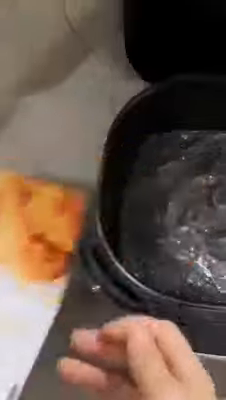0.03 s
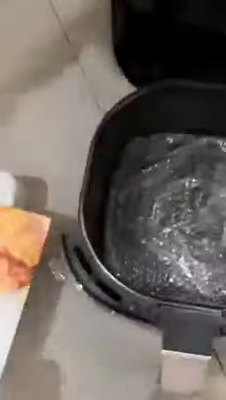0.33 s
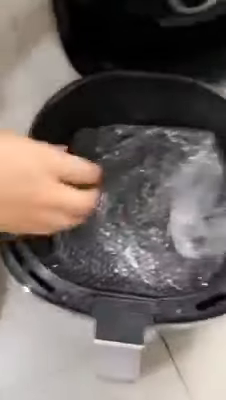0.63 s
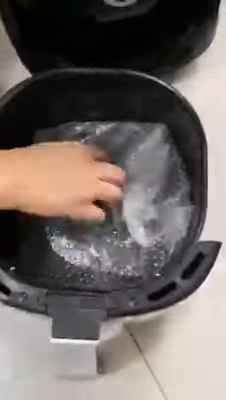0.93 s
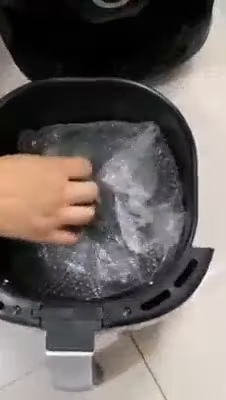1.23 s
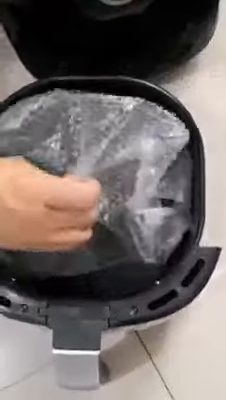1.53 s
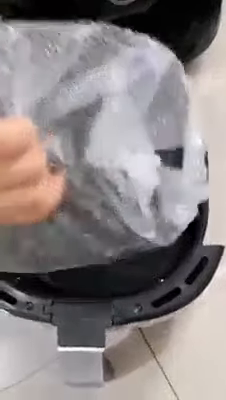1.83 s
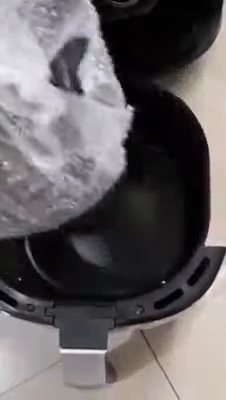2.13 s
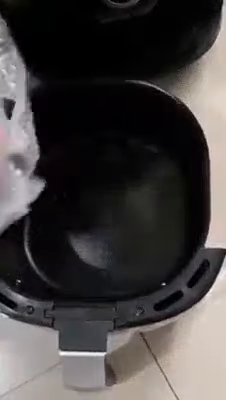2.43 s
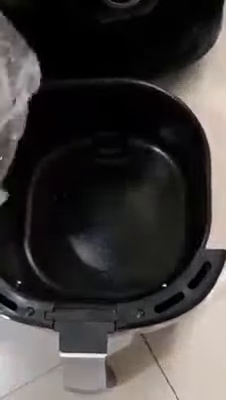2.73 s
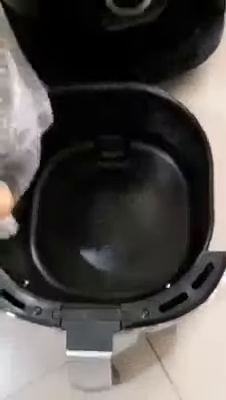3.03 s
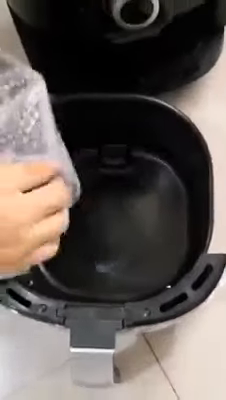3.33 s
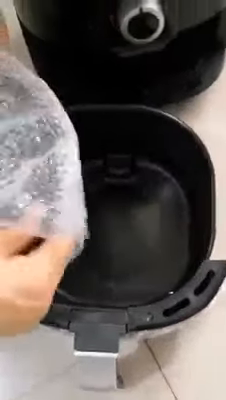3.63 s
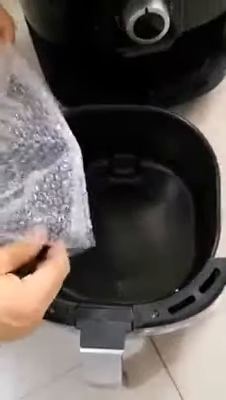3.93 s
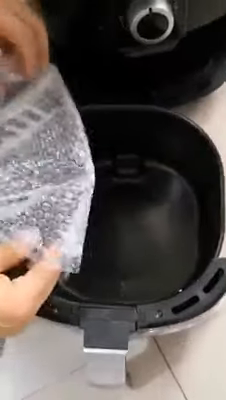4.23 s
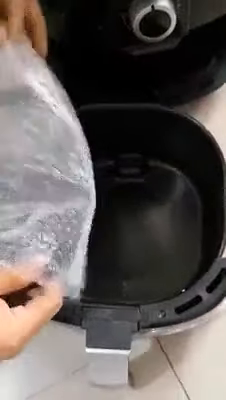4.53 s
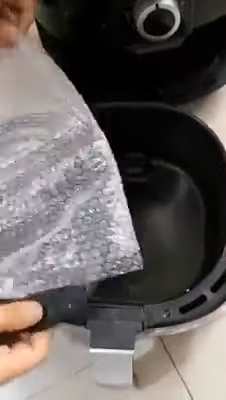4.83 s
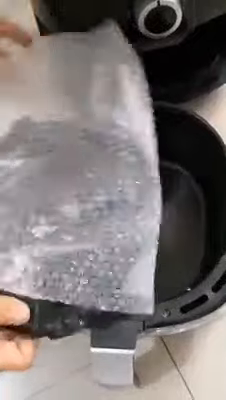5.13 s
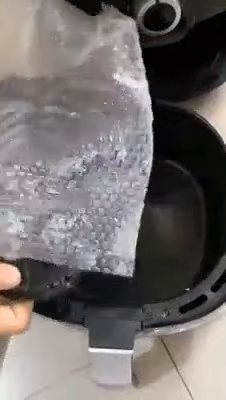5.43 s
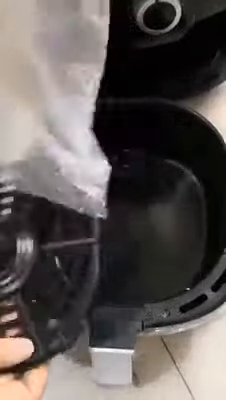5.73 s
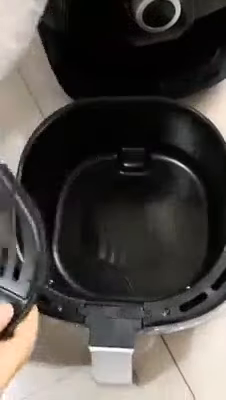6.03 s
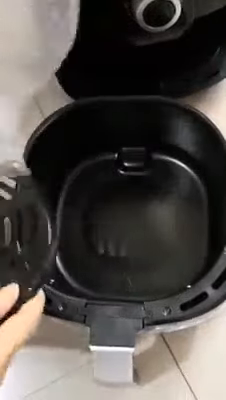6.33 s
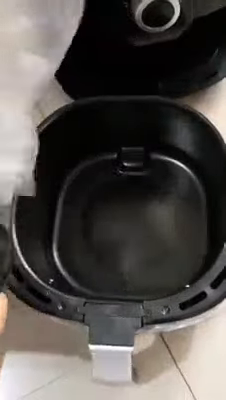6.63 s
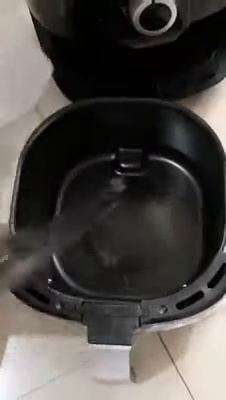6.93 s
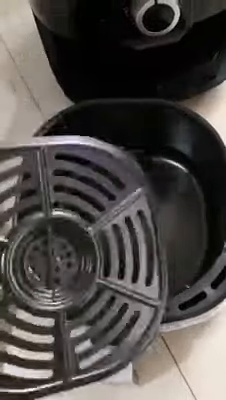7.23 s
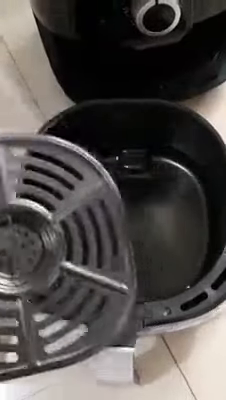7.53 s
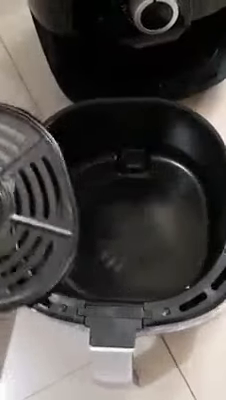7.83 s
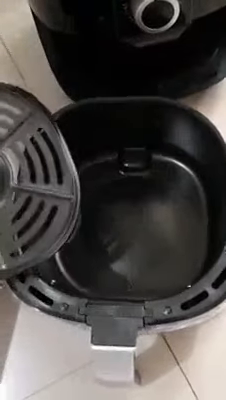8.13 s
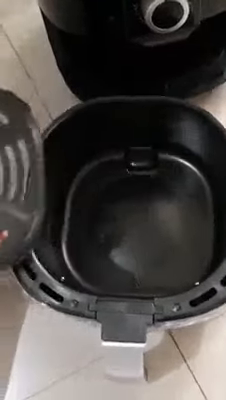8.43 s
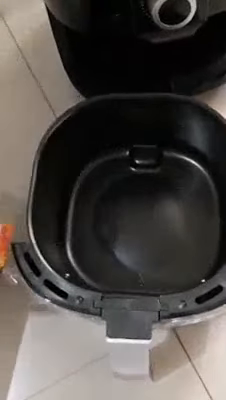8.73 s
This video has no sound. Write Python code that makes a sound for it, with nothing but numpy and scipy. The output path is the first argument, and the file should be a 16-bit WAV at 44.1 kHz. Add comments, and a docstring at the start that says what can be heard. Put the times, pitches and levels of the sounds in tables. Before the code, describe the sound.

A booklet is put down with a few light taps. Bubble wrap starts to crinkle, and the metal plate inside it drops twice into an air fryer basket with short ringing clanks. The wrap crackles in uneven bursts with sharp snaps as it is pulled off. The bare plate knocks softly against the rim, then the wrap rustles aside. The microphone is close, in a quiet room with faint low rumble and hum.

```python
"""On a tiled floor, close to a stereo microphone, a new air fryer is unpacked.
A booklet is put down with a tap, then the crisper plate is lifted in its bubble wrap and drops back
twice into the basket, setting both ringing. The wrap crackles as it is pulled off, its creases
buckling in clumps; the bare plate knocks the rim once and the wrap is pushed aside.
Underneath lie the rumble of arms and floor, a low wavering hum and faint room noise."""
import sys
import numpy as np
from scipy import signal
from scipy.fft import rfft, irfft
from scipy.io import wavfile

SR = 44100
rng = np.random.default_rng(int(sys.argv[2]) if len(sys.argv) > 2 else 0)


def to_wav(sig):
    """Store sig (one row per channel, or 1-D mono) as 16-bit WAV at the path in sys.argv[1].

    Samples outside -1..1 are clipped; the rate is SR.
    """
    pcm = np.clip(np.atleast_2d(sig), -1, 1) * 32767
    pcm = np.round(pcm).astype(np.int16)
    wavfile.write(sys.argv[1], SR, pcm.T)  # frames by channels


N = 387638
TIME = np.arange(N) / SR
BLOW = TIME[:2 * SR // 3]  # seconds after a blow
ROOM_T60_S = 0.31

# Grips and pulls on the wrap. Each row: start, swell and hold in seconds, crisp crackle in dB,
# duller crumpling in dB.
WRAP_PULLS = [(0.0, 0.0016, 0.048, -56, -46), (0.05, 0.061, 0.027, -48.5, -45),
              (0.84, .02, 0.061, -53, -51.5), (0.93, 0.039, 0.035, -35.5, -36),
              (1.025, .025, 0.0099, -39, -39.5), (1.07, 0.081, 0.28, -37.5, -37.5),
              (1.45, 0.027, .2, -41.5, -44.5), (1.7, .02, 0.14, -49, -49.5),
              (2.185, 0.041, 0.092, -39, -43), (2.39, 0.037, .03, -46, -48), (2.49, 0.091, 0.093, -40, -45),
              (2.66, 0.057, 0.066, -36, -43.5), (2.8, .02, 0.079, -44, -50.5),
              (2.96, 0.085, 0.12, -53.5, -56.5), (3.17, 0.055, 0.22, -49, -52), (3.55, .13, 0.17, -43, -47),
              (3.68, 0.052, .015, -33.5, -37), (3.915, 0.032, 0.054, -49.5, -52),
              (4.09, 0.019, 0.074, -48.5, -53), (4.28, .11, 0.087, -47, -52),
              (4.48, 0.032, 0.029, -36.5, -37.5), (4.58, 0.041, 0.1, -35, -35.5),
              (4.83, 0.019, .02, -42.5, -40), (4.87, 0.028, 0.044, -38, -40.5),
              (4.98, .03, .12, -48, -50.5), (5.12, 0.049, 0.21, -43.5, -47.5), (5.39, .04, .11, -39, -40.5),
              (5.52, .05, .055, -33, -34), (5.68, 0.054, 0.016, -34.5, -33), (5.88, 0.038, .03, -50.5, -56),
              (5.98, .03, 0.36, -56, -70), (6.41, .08, .14, -48.5, -52.5),
              (6.66, 0.047, 0.011, -44.5, -46.5), (7.43, 0.019, .1, -51.5, -50),
              (7.545, 0.041, 0.078, -45, -48.5), (7.66, 0.036, 0.043, -43.5, -44.5),
              (7.765, 0.062, 0.11, -41, -42), (7.91, 0.059, .135, -38, -42),
              (8.16, 0.047, 0.13, -56.5, -75), (8.57, 0.067, 0.046, -60, -69)]
SWELL_DB, SAG_DB_PER_S, RELEASE_DB_PER_S, GRAB_DB_PER_S = 11, 10, 240, 805
MIDDLING_PULL_DB, MIDDLING_CREASES_PER_S = -45, 2600
# The film never quite rests between pulls. Each row: time in seconds, crackle level in dB.
FILM_SETTLING = [(0, -60), (0.8, -62), (2.1, -60), (3.5, -63), (6.3, -61), (6.85, -61), (6.95, -65.5),
                 (7.2, -65), (7.38, -71), (7.8, -64), (8.78, -67)]
# The dull side of that settling. Each row: time in seconds, crumpling above crackle in dB.
SETTLING_CRUMPLE = [(0, 9.5), (2.1, 6.5), (3.5, 5), (8.78, 1.5)]
# Single creases snapping. Each row: start in seconds, level in dB.
CREASE_SNAPS = [(1.044, -21), (1.806, -33), (2.2009, -34), (2.6465, -28.5), (3.7412, -24), (4.4932, -22.5),
                (4.5428, -27), (4.6925, -15.5), (5.563, -26), (5.6348, -15), (5.6425, -21), (6.7188, -36)]
# The sheet billows around the plate. Each row: start, swell and hold in seconds, level in dB.
SHEET_BILLOWS = [(1.23, 0.087, 0.093, -40), (1.48, .02, 0.13, -51.5), (4.63, 0.068, .03, -43),
                 (5.1, 0.021, 0.051, -56.5), (5.52, 0.067, 0.061, -45)]
# The wrap's crackle, crumpling and flapping. Each row: frequency in Hz, level in dB.
CRISP_SPECTRUM = [(1000, -39.5), (2400, -6), (3500, 1), (4500, -3), (6000, 1), (9000, -1), (11000, -8),
                  (15000, -13)]
CRUMPLE_SPECTRUM = [(200, -25), (500, -15.5), (780, -8.5), (1100, -8), (1650, -1), (2200, -0.5),
                    (2650, -1.5), (3100, -10), (4500, -13), (9000, -31.5)]
FLAP_SPECTRUM = [(70, -21), (150, -14.5), (220, 2), (320, 3), (430, -3), (600, -17.5), (1500, -46)]

# The rise and fall of the rumble and of the hum. Each row: time in seconds, level in dB.
RUMBLE_LEVELS = [(0.0, -52), (0.9, -58.5), (1.3, -49), (1.98, -54.5), (2.76, -49), (3.03, -60),
                 (3.82, -55.5), (4.21, -59.5), (4.53, -56), (5.53, -54.5), (5.63, -46.5), (5.97, -64.5),
                 (6.73, -54.5), (6.8, -63.5), (7.76, -55), (7.93, -47.5), (8.37, -63.5), (8.79, -59.5)]
HUM_LEVELS = [(0.0, -63), (4.68, -63.5), (5.29, -52.5), (6.05, -70.5), (8.01, -52.5), (8.13, -77),
              (8.79, -59)]
# The tone of the rumble and of the room noise. Each row: frequency in Hz, level in dB.
RUMBLE_SPECTRUM = [(15, -3), (40, -1.5), (55, -6), (69, 1), (85, -1.5), (110, -1.5), (140, 3.5), (175, 4),
                   (230, -9), (500, -38.5), (1500, -49.5)]
ROOM_NOISE_SPECTRUM = [(30, -22), (200, -18), (400, 19), (600, -0.5), (1000, 13.5), (2000, -18),
                       (4000, -13), (9000, -29), (15000, -1)]

# Taps of card and plastic. Each row: start in seconds, level in dB, brightness in Hz, body pitch in Hz.
LIGHT_TAPS = [(0.2048, -26, 3020, 1560), (0.2088, -22.5, 2800, 1480), (0.353, -37, 6900, 1570),
              (0.5533, -30.5, 6920, 1723), (0.579, -38, 3000, 2100), (0.596, -34.5, 3000, 1460),
              (0.612, -38.5, 2400, 1450), (0.856, -46, 6014, 1262), (1.668, -41, 4020, 1770),
              (1.807, -42, 12000, 2510), (4.815, -51, 6060, 2240), (7.4261, -36.5, 11840, 2790),
              (7.432, -44, 4003, 1892), (7.521, -44, 2492, 2042), (8.13, -49, 4986, 2360)]
# The body of a tap. Each row: multiple of the body pitch, level in dB.
TAP_SPECTRUM = [(.1, -23), (.28, -8.5), (.4, -13.5), (.62, 1), (.8, -6.5), (1, -1.5), (1.25, -2.5),
                (1.55, -9), (2.1, -11), (3.2, -18), (6, -24), (10, -37)]
# Dull bumps of the plate. Each row: start in seconds, level in dB, pitch in Hz.
PLATE_BUMPS = [(1.229, -44, 250.4), (1.256, -31.5, 582), (1.425, -38.5, 212), (1.81, -35.5, 290.3),
               (1.85, -38.5, 297.4), (4.721, -41, 292), (4.924, -43, 273.8), (5.044, -50, 250),
               (5.109, -43, 280), (7.113, -41.5, 270.6)]
# Plate against basket. Each row: start in seconds, level in dB, brightness in Hz, basket ring in dB,
# plate ring in dB.
PLATE_CLANKS = [(1.3355, -19.5, 4898, -8, 0.5), (1.424, -20.5, 2580, -3, -2),
                (7.109, -42, 14000, -22, -27.5), (7.117, -48, 2412, 11.5, -25),
                (7.1325, -41, 2402, -4, -25.5)]
# The rattle of the basket shell. Each row: frequency in Hz, level in dB.
SHELL_SPECTRUM = [(130, -15), (260, -9.5), (490, -2.5), (620, -11.5), (950, 6), (1150, -8), (1450, -13.5),
                  (1800, 3), (2200, -12), (2550, -3), (3300, -14.5), (4500, -21), (8500, -18), (14000, -25)]
# Modes of basket and plate. Each row: frequency in Hz, level in dB, seconds to fall by 60 dB.
BASKET_RING = [(455, -6, .2), (567, -7, .24), (666, -13, .22), (786, -6, .2), (925, -7, .16),
               (967, -6, .18), (1281, -11, .5), (1677, -6, .18), (1772, -7, .18), (1945, -7, .18),
               (2040, -12, .48), (2491, -8, .2)]
PLATE_RING = [(400, -4, .48), (779, -5, .55), (969, -4, .22), (1720, -9, .25), (1797, -6, .24),
              (1889, -6, .24), (1967, -5.5, .27), (2805, -13, .22)]

# The tone of each channel: the left is brighter near 7.9 kHz, and both drop sharply just above 8 kHz.
# Each row: frequency in Hz, gain in dB.
LEFT_RESPONSE = [(480, 0), (700, 2), (1050, -1), (2400, 0), (4400, 1), (5600, 3), (6400, 3), (7200, 7),
                 (7900, 11), (8200, -5), (9100, -1), (10000, -4), (11200, -11), (14500, -9)]
RIGHT_RESPONSE = [(430, 0), (700, -3), (1200, 0), (2400, 0), (3000, -2), (4600, -2), (7000, 0), (7900, 1),
                  (8200, -5), (9200, 1), (10000, 0), (12000, -9), (14500, -9)]


def from_db(db):
    return 10 ** (np.asarray(db) / 20)


def rms_one(x):
    return x / np.sqrt(np.mean(x ** 2) + 1e-20)


def unit_blow(x):
    """Scale to the energy of a hundredth of a second at rms 1."""
    return x / np.sqrt(np.sum(x ** 2) / SR / .01)


def in_time(rows):
    """A curve of (seconds, value) points at every sample."""
    return np.interp(TIME, *np.transpose(rows))


def fade(t, t60):
    return np.exp(-np.log(1000) * t / t60)


def cut(x, hz, kind, order=2):
    return signal.sosfilt(signal.butter(order, hz, kind, fs=SR, output="sos"), x)


def colour(x, points, size=4096):
    """Minimum-phase filter that follows a spectrum of (Hz, dB) points."""
    hz, db = np.transpose(points)
    grid = np.maximum(np.fft.rfftfreq(size, 1 / SR), 1)
    gain = from_db(np.interp(np.log(grid), np.log(hz), db))
    cepstrum = irfft(np.log(gain))
    cepstrum[1:size // 2] *= 2
    cepstrum[size // 2 + 1:] = 0
    response = irfft(np.exp(rfft(cepstrum))).reshape((1,) * (x.ndim - 1) + (-1,))
    return signal.oaconvolve(x, response, axes=-1)[..., :x.shape[-1]]


def drift(per_s):
    """A random wander with a spread of about 1."""
    knots = np.arange(0, TIME[-1] + 1, 1 / per_s)
    return np.interp(TIME, knots, rng.standard_normal(len(knots)))


def add(track, s, sound):
    start = round(s * SR)
    track[:, start:start + sound.shape[1]] += sound[:, :N - start]


def room(x, wet_db, early_db, lead=0, alike_hz=350):
    """At the microphone: direct sound (left `lead` samples early), basket and tile echoes, a tail."""
    t = BLOW[:SR // 3]
    mid, side = rng.standard_normal((2, len(t)))
    side = cut(side, alike_hz, "high", order=1)  # the bass is alike in both channels
    diffuse = np.array([mid + side, mid - side]) * (t > .0005)
    early = from_db(early_db) * rms_one(diffuse * fade(t, 0.046))
    tail = from_db(wet_db) * rms_one(diffuse * fade(t, ROOM_T60_S) * (t > .008))
    response = (early + tail) / np.sqrt(len(t))
    response[0, max(-lead, 0)] += 1
    response[1, max(lead, 0)] += 1
    response /= np.sqrt(np.sum(response ** 2) / 2)
    return signal.oaconvolve(x[None], response, axes=-1)[:, :len(x)]


def gesture(start, swell, hold):
    """Power of one hand movement, every 32nd sample: it grabs, swells, sags while held and lets go."""
    t = TIME[::32] - start
    grab_db = GRAB_DB_PER_S * np.minimum(t, 0)
    swell_db = SWELL_DB * (np.clip(t / swell, 0, 1) - 1)
    sag_db = SAG_DB_PER_S * np.clip(t - swell, 0, hold)
    release_db = RELEASE_DB_PER_S * np.maximum(t - swell - hold, 0)
    return from_db(np.maximum(grab_db + swell_db - sag_db - release_db, -150)) ** 2


def gestures(rows):
    """Summed power of hand movements at every sample, one curve for each level column."""
    powers = sum(np.outer(from_db(row[3:]) ** 2, gesture(*row[:3])) for row in rows)
    return [np.interp(TIME, TIME[::32], power) for power in powers]


def film_effort():
    """Levels of crackle and crumpling in dB: the pulls on top of the settling."""
    crisp_power, crumple_power = gestures(WRAP_PULLS)
    rest_db = in_time(FILM_SETTLING)
    crisp_power += from_db(rest_db) ** 2
    crumple_power += from_db(rest_db + in_time(SETTLING_CRUMPLE)) ** 2
    return 10 * np.log10(crisp_power), 10 * np.log10(crumple_power)


def creases(per_s, spread_db, clump_db):
    """Buckling creases: many small clicks, a few large ones, coming in clumps."""
    at = np.flatnonzero(rng.random(N) < per_s / SR)
    sizes = from_db(spread_db * np.minimum(rng.exponential(1, len(at)), 4))
    clicks = np.zeros(N)
    clicks[at] = sizes * rng.choice([-1, 1], len(at))
    return rms_one(clicks / np.sqrt(per_s) * from_db(clump_db * drift(130)))


def wrap_crackle(crisp_db, crumple_db):
    """The harder the film is worked, the thicker its creases come; each patch has its own echoes."""
    per_s = MIDDLING_CREASES_PER_S * from_db(.4 * (crisp_db - MIDDLING_PULL_DB))
    crisp = from_db(crisp_db + 3.5) * creases(per_s, spread_db=3.3, clump_db=1.4)
    crumple = from_db(crumple_db + 12) * creases(.6 * per_s, spread_db=2.44, clump_db=1.4)
    leads = [26, 13, 7, 6, 6, 5, -1]  # seven patches, mostly left of the microphone
    strain = np.array([drift(22) for _ in leads]) + 1.2 * rng.random((len(leads), N))
    buckling_patch = np.argmax(strain, axis=0)  # the most strained one gives way
    out = np.zeros((2, N))
    for k, lead in enumerate(leads):
        active = buckling_patch == k
        pitch_ratio = np.exp(.09 * np.sin(2 * np.pi * k / 3))  # stiffer patches sound higher
        patch = colour(crisp * active, CRISP_SPECTRUM)
        patch += colour(crumple * active, np.array(CRUMPLE_SPECTRUM) * [pitch_ratio, 1])
        out += room(patch, wet_db=-8, early_db=2, lead=lead)
    return out


def sheet_flaps(crumple_db):
    """The whole sheet flaps along with the crumpling and billows around the plate."""
    billow_power, = gestures(SHEET_BILLOWS)
    flap_power = from_db(-58.5 + 0.69 * (crumple_db - MIDDLING_PULL_DB)) ** 2
    mid = creases(500, spread_db=2.9, clump_db=2.1)
    side = 0.4 * creases(380, spread_db=3, clump_db=1.5)
    flaps = colour(np.array([mid + side, mid - side]), FLAP_SPECTRUM)
    return np.sqrt(flap_power + billow_power) * rms_one(flaps)


def rumble():
    """Arms and floor rumble, alike in both channels."""
    return from_db(in_time(RUMBLE_LEVELS)) * rms_one(colour(rng.standard_normal(N), RUMBLE_SPECTRUM))


def hum(hz=69.3, wavers_per_s=7):
    """A low, wavering hum comes and goes, alike in both channels."""
    waver = drift(wavers_per_s) + 1j * drift(wavers_per_s)
    tone = np.real(waver * np.exp(2j * np.pi * hz * TIME))
    return from_db(in_time(HUM_LEVELS) - 2.5) * rms_one(tone)


def room_noise():
    """Faint steady room noise, wide in stereo."""
    noise = rng.standard_normal(N) + 2.1 * rng.standard_normal((2, N))
    return from_db(-66.5) * rms_one(colour(noise, ROOM_NOISE_SPECTRUM))


def contact(t60, crack_db, chatter_db, chatter_t60):
    """Surfaces yield, crack, and leave a thin shell's crowded, fast-dying vibration and weak tail."""
    yielding = 1 - fade(BLOW, 0.007)
    crack = from_db(crack_db) * fade(BLOW, 0.0057)
    chatter = from_db(chatter_db) * fade(BLOW, chatter_t60)
    return (fade(BLOW, t60) + crack + chatter) * yielding * rng.standard_normal(len(BLOW))


def taps():
    """Card and plastic are damped at once; smaller parts answer higher."""
    out = np.zeros((2, N))
    for s, db, bright_hz, body_hz in LIGHT_TAPS:
        strike = contact(t60=0.026, crack_db=1.5, chatter_db=-21, chatter_t60=0.32)
        body = colour(strike, np.array(TAP_SPECTRUM) * [body_hz, 1])
        knock = unit_blow(cut(body, bright_hz, "low", order=1))
        add(out, s, room(from_db(db + 1) * knock, wet_db=-6.5, early_db=0, alike_hz=970))
    return out


def crease_snaps():
    """Single creases snap, each a short burst with the tone of the film."""
    out = np.zeros((2, N))
    for s, db in CREASE_SNAPS:
        burst = (fade(BLOW, 0.027) * rng.standard_normal(len(BLOW)))[:SR // 4]
        snap = colour(burst, CRISP_SPECTRUM) + from_db(14.5) * colour(burst, CRUMPLE_SPECTRUM)
        add(out, s, room(from_db(db - 14.5) * unit_blow(snap), wet_db=-19, early_db=5.5))
    return out


def plate_bumps():
    """Dull thuds of plate and basket, each with one hollow, dying tone."""
    out = np.zeros((2, N))
    for s, db, hz in PLATE_BUMPS:
        strike = contact(t60=0.068, crack_db=4, chatter_db=-20, chatter_t60=0.15)
        muffled = cut(strike, hz * 1.13, "low", order=4)
        thud = unit_blow(cut(muffled, hz * 0.99, "high"))
        thud = room(thud, wet_db=1, early_db=-1, alike_hz=150)
        hollow = np.sin(2 * np.pi * hz * BLOW) * (fade(BLOW, 0.22) - fade(BLOW, 0.0066))
        add(out, s, from_db(db - 0.5) * (thud + 0.8 * unit_blow(hollow)))
    return out


def ring(modes):
    """Struck modes die away; the higher a mode, the more its phase differs from left to right."""
    hz, db, t60 = np.transpose(modes)[:, :, None]
    strength = from_db(db) * fade(BLOW, t60) * (-1) ** np.arange(len(modes))[:, None]
    phase = 2 * np.pi * hz * BLOW
    apart = np.clip(hz / 2600, 0, 1) ** 2 * np.pi / 3
    return np.array([np.sum(strength * np.sin(phase + side * apart), axis=0) for side in (1, -1)])


def plate_clanks():
    """Each blow of the plate rattles the basket shell and sets basket and plate ringing."""
    out = np.zeros((2, N))
    for s, db, bright_hz, basket_db, plate_db in PLATE_CLANKS:
        strike = contact(t60=0.11, crack_db=14, chatter_db=-13.5, chatter_t60=0.39)
        rattle = unit_blow(colour(strike, SHELL_SPECTRUM))
        shell = room(rattle, wet_db=-7, early_db=-3, alike_hz=1000)
        tones = from_db(basket_db) * ring(BASKET_RING) + from_db(plate_db) * ring(PLATE_RING)
        clank = cut(shell + from_db(-6.5) * tones, bright_hz, "low", order=1)
        add(out, s, from_db(db + 6) * clank)
    return out


def scene():
    """Wrap, plate and taps close to the microphone, over rumble, hum and room noise."""
    crisp_db, crumple_db = film_effort()
    wrap = wrap_crackle(crisp_db, crumple_db) + crease_snaps()
    knocks = plate_clanks() + taps()
    handling = sheet_flaps(crumple_db) + plate_bumps() + rumble()
    return wrap + knocks + handling + hum() + room_noise()


def record(dry, cutoff_hz=15500):
    """Each channel has its own tone; the top is cut steeply."""
    heard = np.array([colour(dry[0], LEFT_RESPONSE), colour(dry[1], RIGHT_RESPONSE)])
    return signal.sosfilt(signal.ellip(10, .2, 80, cutoff_hz, fs=SR, output="sos"), heard)


dry = scene()
out = record(dry)
to_wav(out)
```